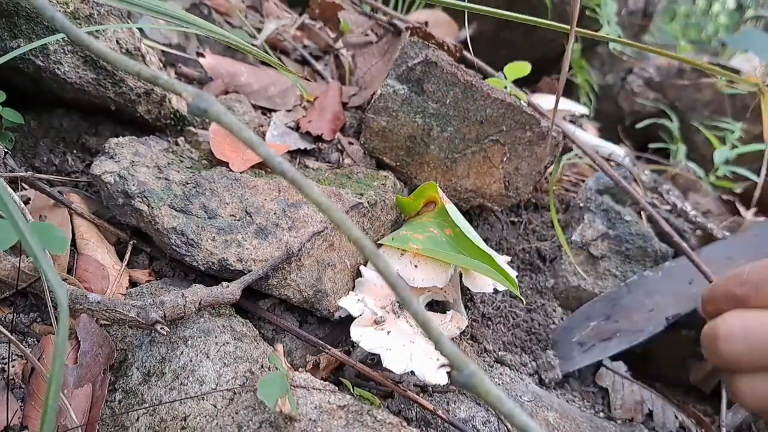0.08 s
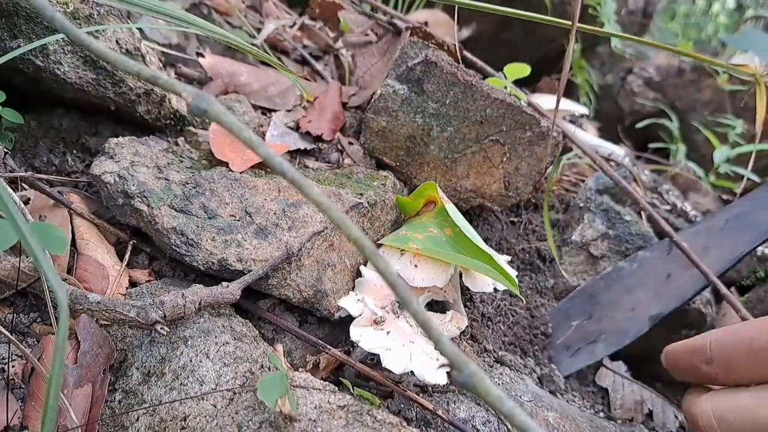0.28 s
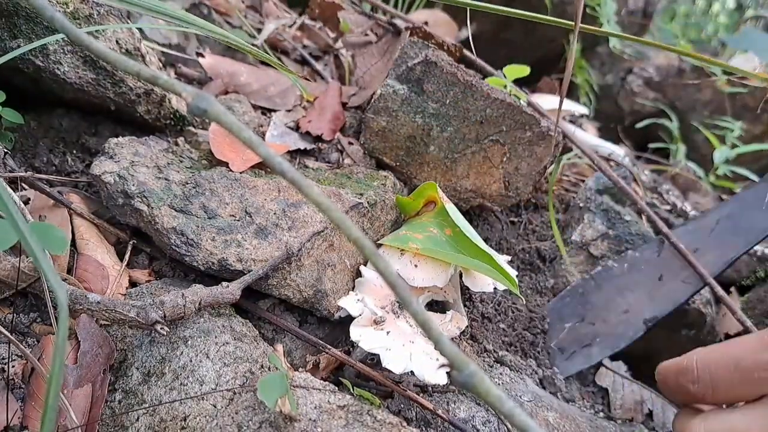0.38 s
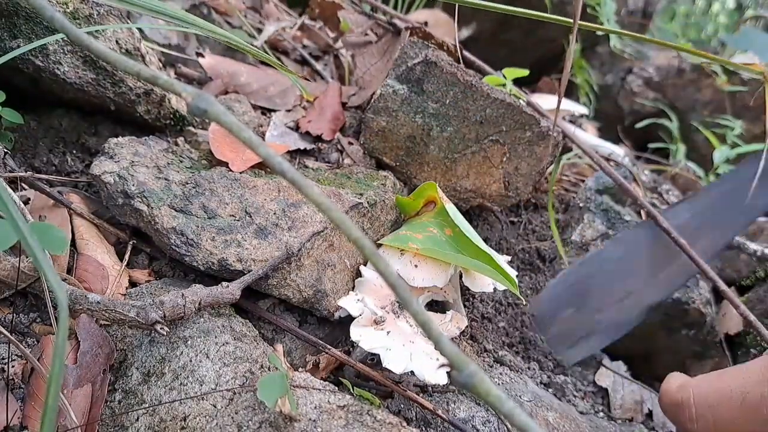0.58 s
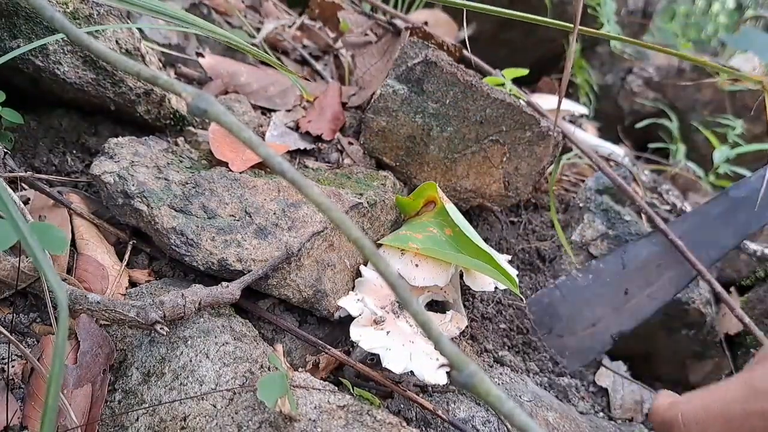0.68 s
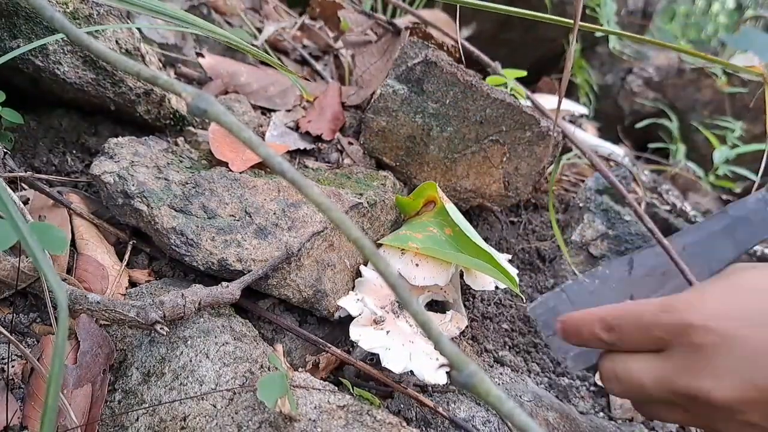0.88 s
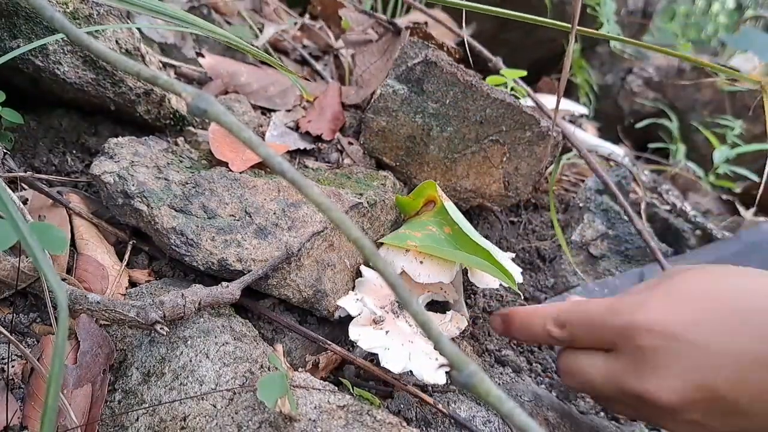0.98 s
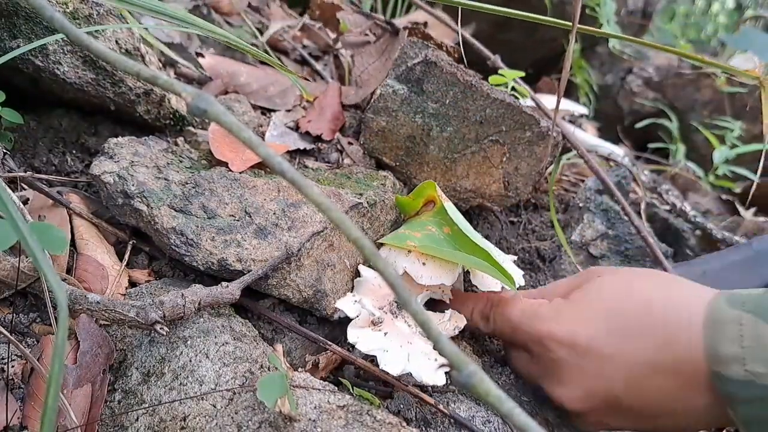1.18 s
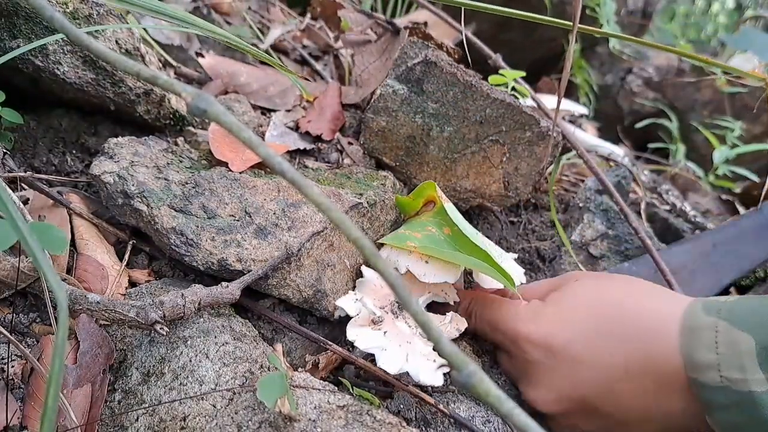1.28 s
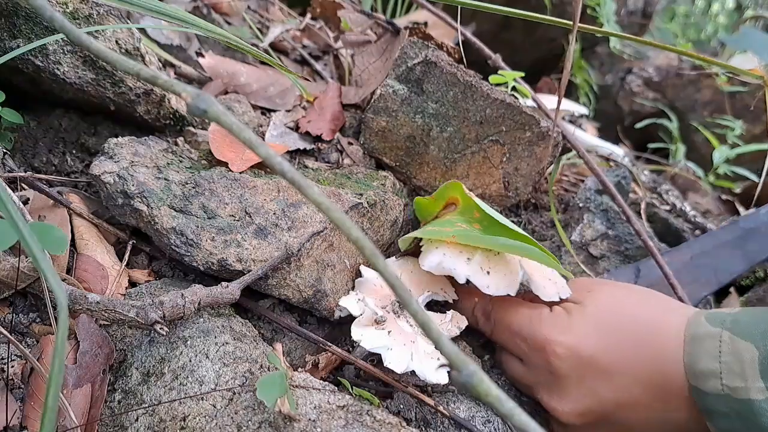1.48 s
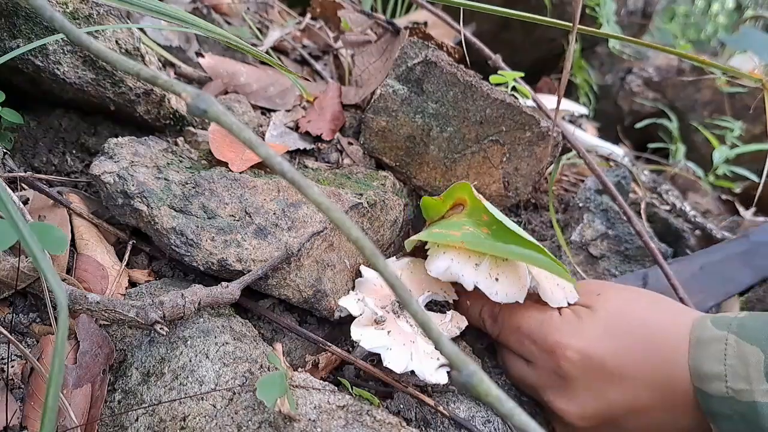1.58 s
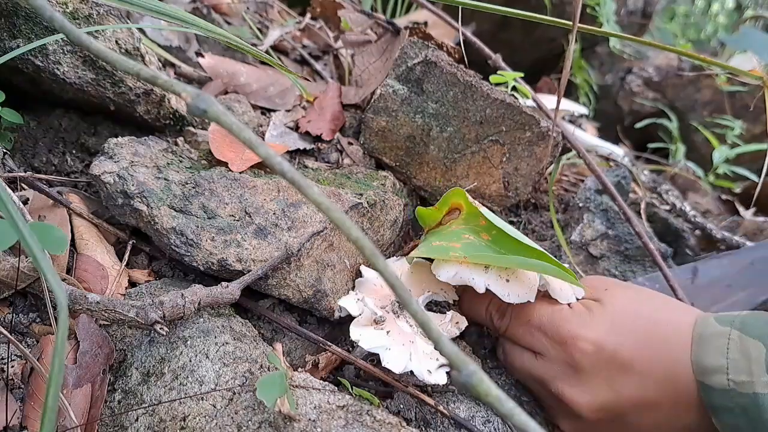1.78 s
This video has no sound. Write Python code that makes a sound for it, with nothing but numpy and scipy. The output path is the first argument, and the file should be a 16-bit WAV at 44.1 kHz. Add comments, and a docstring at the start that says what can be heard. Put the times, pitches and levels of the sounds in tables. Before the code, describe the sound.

A broad knife digs through stony soil, very close. Uneven gritty scrapes start at once, with small steel clinks from 0.2 s, a hard crunch near 0.3 s, a bright knock on stone at 0.56 s and a strong scrape around 0.6-0.68 s. Softer rubbing follows, one sharp crack at 1.0 s, then a faint thump near 1.4 s and light clicks and rustles fading by 1.85 s. Dry, faint forest air, right-leaning.

```python
"""Grit scrapes first: a broad steel knife is pushed into stony forest soil close to a phone.
Dense tiny clicks make the grit, in bursts and in a steadier scrape; low rough noise makes the soil thud under it.
Damped steel modes ring with the scrape and when the blade meets stone; later a hand works through grit and leaves.
Single pebbles and leaves crack as brief fading noise, over short reflections, a faint tail and faint forest air."""
import sys
import numpy as np
from scipy import signal
from scipy.fft import rfft, irfft, next_fast_len
from scipy.io import wavfile
from scipy.ndimage import uniform_filter1d, map_coordinates

SR = 44100
rng = np.random.default_rng(int(sys.argv[2]) if len(sys.argv) > 2 else 0)


def gain_from_decibels(decibels):
    """Convert decibel values to linear amplitude factors."""
    exponent = np.asarray(decibels, float) / 20
    return 10 ** exponent


def to_wav(s):
    """Save 16-bit WAV."""
    ch = np.atleast_2d(s).T  # columns
    pcm = np.round(np.clip(ch, -1, 1) * 32767)  # PCM
    wavfile.write(sys.argv[1], SR, pcm.astype(np.int16))


N = 81585


def colour(x, table):
    """Shape a spectrum by (Hz, dB) points, joined along log frequency."""
    hz, db = np.array(table, float).T
    n = next_fast_len(len(x) + 4096)
    log_hz = np.log(np.maximum(np.arange(n // 2 + 1) * SR / n, 1))
    gain = gain_from_decibels(np.interp(log_hz, np.log(hz), db))
    return irfft(rfft(x, n) * gain, n)[:len(x)]


def unit(x):
    """Scale to rms 1."""
    return x / np.sqrt(np.mean(x ** 2))


def fades(at, db, t60, rise):
    """One envelope per event: quick rise to its moment, exponential fade."""
    after = np.arange(N) / SR - np.array(at)[:, None]
    fall = -np.log(1000) * after / np.array(t60)[:, None]
    return gain_from_decibels(np.array(db))[:, None] * np.exp(np.where(after < 0, after / rise, fall))


def forest_air():
    """Faint forest air: separate noise at each port, darker towards the treble."""
    tilt = [(60, -2.5), (1000, -19.5), (15000, -16.0)]
    level_db = -59
    return gain_from_decibels(level_db) * np.array([unit(colour(rng.standard_normal(N), tilt)) for _ in range(2)])


def scatter(x):
    """Short reflections off nearby stones and a faint tail among the trees, as decaying noise echoes."""
    near_db, near_t60_s = -15, 0.016
    tail_db, tail_t60_s = -21.5, 0.41
    a = np.arange(SR // 4) / SR

    def echoes(t60_s):
        """Decaying noise of total energy 1, silent for the first 0.3 ms."""
        noise = rng.standard_normal(len(a)) * np.exp(-np.log(1000) * a / t60_s) * (a > .0003)
        return unit(noise) / np.sqrt(len(a))

    response = gain_from_decibels(near_db) * echoes(near_t60_s) + gain_from_decibels(tail_db) * echoes(tail_t60_s)
    return x + signal.fftconvolve(x, response)[:N]


# dull thumps in the ground: start_s, level_db, pitch_hz, fade_t60_s
THUMPS = [(1.406, -38, 147.5, 0.12)]


def thumps():
    """Low damped swings of the ground, roughened by shifting soil."""
    out = 0
    for start_s, db, hz, t60 in THUMPS:
        a = np.maximum(np.arange(N) / SR - start_s, 0)
        around = [(hz / 2, -20), (hz, 0), (2 * hz, -16), (4 * hz, -40)]
        fade_in = np.minimum(a * hz * 2, 1)  # over half a swing
        rough = unit(colour(rng.standard_normal(N), around)) * fade_in
        out = out + gain_from_decibels(db) * (np.sin(2 * np.pi * hz * a) + rough) * np.exp(-np.log(1000) * a / t60)
    return out


def clumps(rate, spread_db):
    """Quick uneven swells, as clumps give way."""
    k = int(SR / rate)
    swell_db = uniform_filter1d(np.repeat(rng.standard_normal(N), k)[:N], k)
    return unit(gain_from_decibels(spread_db * swell_db))


def grains(rate, spread_db):
    """Random clicks, mostly small, a few large, over a little hiss."""
    chance, luck, sign = rng.random((3, N))
    size = gain_from_decibels(np.minimum(-spread_db * np.log(luck + 1e-9), 4 * spread_db))
    clicks = (chance < rate / SR) * size * np.sign(sign - .5)
    return unit(clicks + 0.27 * rng.standard_normal(N))


# weight of the soil across the spectrum: pitch_hz, level_db
SOIL = [(30, -34), (130, -3.5), (330, -3), (850, -4.5), (1200, -20.5)]


def soil_rumble(low):
    """Soil thudding under the strokes: clumpy, darkened grains, plus the thumps."""
    rumble = unit(colour(grains(700, 5.1), SOIL))
    return rumble * low * clumps(59.96, 4.5) + thumps()


# strokes through the soil: start_s, end_s, grit_start_db, grit_end_db, soil_start_db
STROKES = [(.004, 0.061, -39, -35.5, -44), (0.084, 0.104, -29, -39, -33), (0.168, 0.224, -57, -34, -74),
           (0.236, 0.313, -34.5, -44.5, -40), (0.302, 0.329, -15.5, -25, -20.5),
           (0.321, 0.357, -29, -36, -28.5), (0.357, 0.384, -31.5, -48, -31.5),
           (0.404, 0.507, -41.5, -47.5, -45.5), (0.523, 0.585, -28.5, -41.5, -77),
           (0.6, 0.626, -47, -18.5, -67), (0.625, 0.646, -18, -15, -28.5), (0.665, 0.678, -30, -27, -33.5),
           (0.7, 0.715, -64.5, -57, -55), (0.755, 0.862, -41.5, -42, -49.5),
           (0.894, 0.947, -52, -49.5, -54.5), (0.956, 1.155, -35.5, -48.5, -41.5),
           (1.206, 1.295, -44.5, -47.5, -53), (1.372, 1.412, -49.5, -54.5, -86),
           (1.503, 1.517, -57, -47, -88), (1.532, 1.594, -36, -46.5, -58), (1.598, 1.674, -46, -56, -57),
           (1.686, 1.85, -57.5, -65.5, -68)]


def strokes():
    """Grit and soil envelopes of all strokes, soft at the edges; soil follows the slope of the grit."""
    rise_s, edge_s, soil_smooth_s = 0.0013, 0.01, 0.0029
    t, grit_power, soil_power = np.arange(N) / SR, 0, 0
    for a, b, db0, db1, soil_db in STROKES:
        on = np.exp(-np.maximum(a - t, 0) / rise_s - np.maximum(t - b, 0) / edge_s)
        grit_power = grit_power + (on * gain_from_decibels(np.interp(t, [a, b], [db0, db1]))) ** 2
        soil_power = soil_power + (on * gain_from_decibels(soil_db + np.interp(t, [a, b], [0, db1 - db0]))) ** 2
    soil_power = uniform_filter1d(soil_power, int(soil_smooth_s * SR)).clip(0)
    return np.sqrt(grit_power), np.sqrt(soil_power)


def crackles():
    """Envelope of sparse small snaps, a few ms each."""
    per_s, level_db, decay_s = 120, -2, 0.00076
    chance, luck = rng.random((2, N))
    hits = (chance < per_s / SR) * gain_from_decibels(np.minimum(-5 * np.log(luck + 1e-9), 10))
    return gain_from_decibels(level_db) * unit(signal.lfilter([1], [1, -np.exp(-1 / (decay_s * SR))], hits))


def patchy(rate, spread_db):
    """Grit clicks whose octave bands break partly apart, so each grain has its own colour."""
    out, common = 0, grains(rate, spread_db)
    for hz in 350 * 2. ** np.arange(6):
        sos = signal.butter(2, [hz, min(2 * hz, .45 * SR)], "band", fs=SR, output="sos")
        own = grains(rate * hz / 4000, spread_db)  # more clicks in the higher bands
        out = out + signal.sosfiltfilt(sos, common + 0.64 * own)
    return out


# single pebbles and leaves cracking: peak_s, level_db, fade_t60_s
TICKS = [(0.105, -28, 0.0052), (0.2249, -23.5, 0.035), (.3420, -13, 0.029), (0.4446, -24.5, 0.026),
         (.4560, -26.5, 0.017), (0.558, -16.5, 0.041), (0.7299, -25, 0.02), (.8800, -31, 0.022),
         (1.009, -13, 0.024), (1.036, -37, 0.014), (1.4055, -22.5, 0.013), (1.5382, -30, 0.034),
         (1.5621, -25, 0.034), (1.5870, -34, 0.023), (1.5981, -28, 0.016), (1.636, -39.5, 0.017),
         (1.722, -44.5, 0.027)]


def ticks():
    """Summed envelope of the single cracks, each with a sharp rise and a short fade."""
    peak_s, level_db, t60_s = np.array(TICKS).T
    return fades(peak_s, level_db, t60_s, 0.00094).sum(0)


# brightness of grit and cracks: pitch_hz, level_db
GRIT = [(200, -17), (400, -7.5), (800, -13), (1800, 2.5), (3000, -5.5), (4600, 3), (6400, -3.5),
        (7900, 1.5), (10000, -9), (13000, -2), (16000, -9.5)]


def grit_ports(grit, press, cracks):
    """Grit under the strokes plus noisy cracks; an extra layer of clicks sets the left port apart."""
    apart = 0.22
    snap = unit(colour(rng.standard_normal(N), GRIT)) * cracks
    left_clicks = grit[0] + apart * colour(grit[1], [(1000, 16), (4000, 22.5)])
    return [unit(colour(clicks, GRIT)) * (press + .5 * cracks) + snap for clicks in (left_clicks, grit[0])]


# blade meeting stone: start_s, level_db, low_modes_db (relative, at 1034 Hz)
STRIKES = [(.2225, -27, -15), (.2625, -27, -15), (.3140, -26, -5), (.5235, -23, -18), (.5335, -25, -12),
           (.5585, -15, 2)]


def strikes():
    """One impulse per knock on stone, its low end weighted to push the lowest modes more or less."""
    out = 0
    for start_s, db, low_db in STRIKES:
        impulse = gain_from_decibels(db) * (np.arange(N) == int(start_s * SR))
        out = out + colour(impulse, [(1034, low_db), (2896, 0)])
    return out


# strength and full ring of each blade mode, before soil shortens it: level_db, ring_t60_s
BLADE = [(-7, .05), (-14, .04), (1, .055), (-7, .08), (-1, .045), (3, .035), (-4, .03), (-6, .04),
         (-4, .04), (-9, .04), (-9, .045), (-11, .045), (-13, .3)]
# the same modes' pitches, before prising raises them: pitch_hz
BLADE_HZ = [1034, 1700, 2896, 3854, 4290, 4975, 5260, 6169, 7260, 8550, 9750, 11530, 13400]


def blade(push, ring_share, pitch=1):
    """The steel's modes; soil around the blade shortens their ring, prising raises their pitch."""
    out = 0
    for hz, (db, t60) in zip(BLADE_HZ, BLADE):
        p = np.exp(2j * np.pi * pitch * hz / SR - np.log(1000) / (ring_share * t60 * SR))
        jolt = np.diff(push, prepend=0) / abs(1 - 1 / p)  # evens out the tilt of differencing
        out = out + gain_from_decibels(db) * signal.lfilter([1], [1, -p], jolt).imag
    return out


def blade_ring(grit, press, cracks):
    """Grit and knocks drive the steel: buried in soil, then prised at raised pitch, then free."""
    prise_start_s, free_start_s = 1.39, 1.66
    scrape_db, prise_db, free_db = -35, -21, -31
    t = np.arange(N) / SR
    prise_tone = [(1000, -12), (4500, 4), (5200, -5), (8000, 2), (13000, -8)]
    prise = colour(unit(grit[1]) * (press + cracks) * (t > prise_start_s), prise_tone)
    scrape = unit(grit[0]) * press * gain_from_decibels(scrape_db) * (t < prise_start_s)
    buried = blade(scrape, ring_share=0.44)
    free = blade(strikes() + gain_from_decibels(free_db) * prise * (t > free_start_s), ring_share=0.97)
    prised = gain_from_decibels(prise_db) * blade(prise * (t < free_start_s), ring_share=.2, pitch=1.045)
    return buried + free + prised


def digging():
    """Grit as each port gets it, with blade ring; soil rumble and thumps."""
    press, low = strokes()
    press = press * np.hypot(clumps(150, 3), crackles())
    cracks = ticks()
    grit = [patchy(rate=2500, spread_db=5) for _ in range(2)]
    ring = blade_ring(grit, press, cracks)
    ports = [port + ring for port in grit_ports(grit, press, cracks)]
    return ports, soil_rumble(low)


# left port against the right: pitch_hz, left_minus_right_db
LEFT = [(150, -1), (1300, -1.5), (4400, -11), (8000, -8.5), (15000, -4)]
# how much later the left port hears: time_s, lag_ms
LAG = [(0.681, 0.2864), (.7, 0.088)]


def left_port(x):
    """Delay by a gliding lag, then weaken across the spectrum."""
    n = np.arange(N)
    time_s, lag_ms = np.array(LAG).T
    lag = np.interp(n / SR, time_s, lag_ms) * SR / 1000
    return colour(map_coordinates(x, [n - lag], mode="mirror"), LEFT)


def scene():
    """Both ports hear the digging, the left later and weaker, over faint forest air."""
    (left, right), soil = digging()
    left, right = scatter(left) + soil, scatter(right) + soil
    return np.array([left_port(left), right]) + forest_air()


def low_pass(x):
    """Removes everything above the highest recorded frequency."""
    return signal.sosfilt(signal.butter(12, 17140, fs=SR, output="sos"), x)


def record(dry):
    """The loudest peaks are softly rounded; the phone cuts bottom and top."""
    top_cut = signal.ellip(8, .2, 60, 16300, fs=SR, output="sos")
    low_cut = signal.butter(2, 50, "high", fs=SR, output="sos")
    rounded = np.tanh(dry)
    return low_pass(signal.sosfilt(np.vstack([top_cut, low_cut]), rounded))


dry = scene()
out = record(dry)
to_wav(out)
```